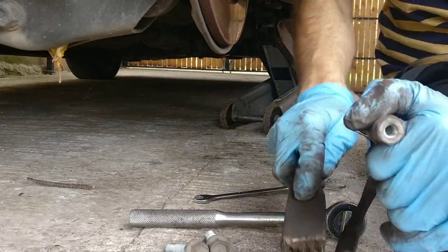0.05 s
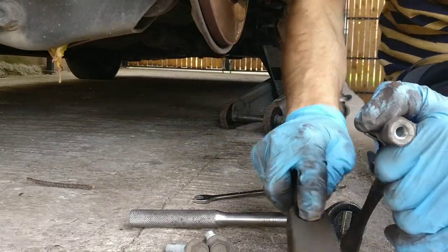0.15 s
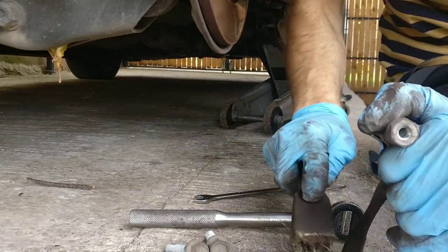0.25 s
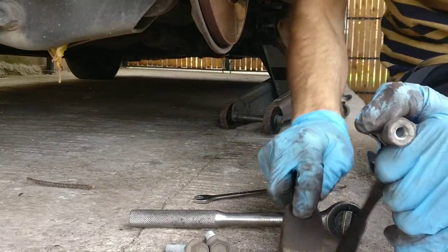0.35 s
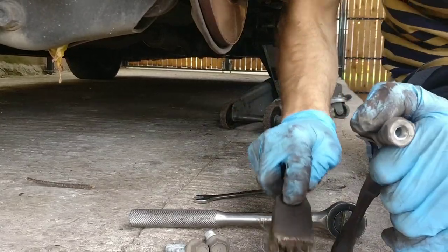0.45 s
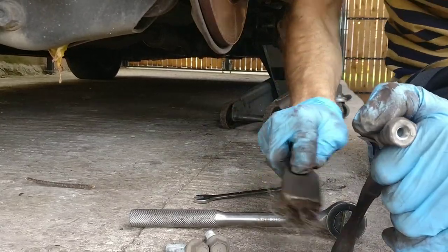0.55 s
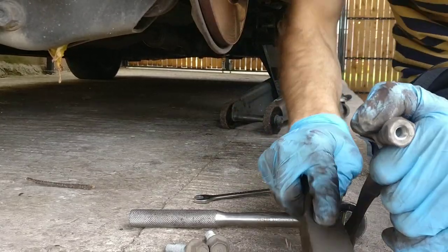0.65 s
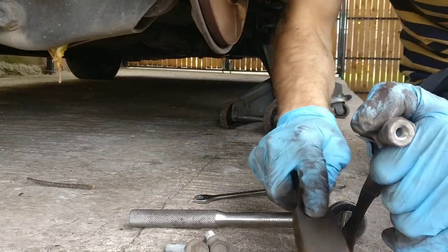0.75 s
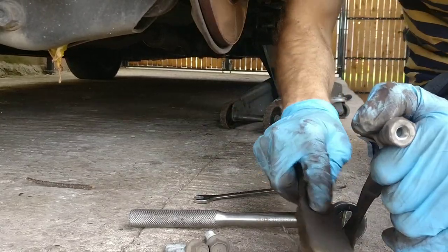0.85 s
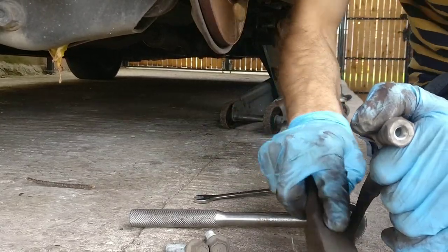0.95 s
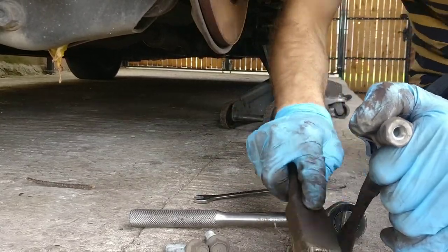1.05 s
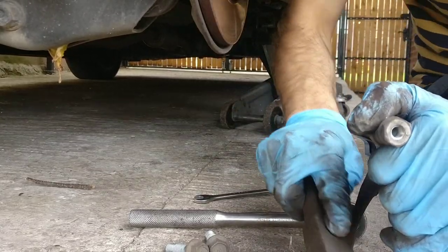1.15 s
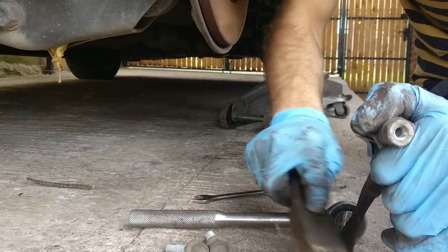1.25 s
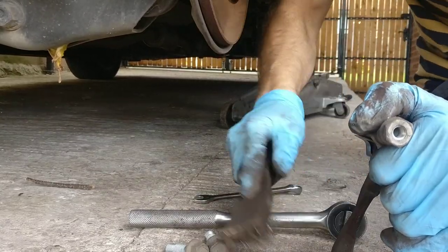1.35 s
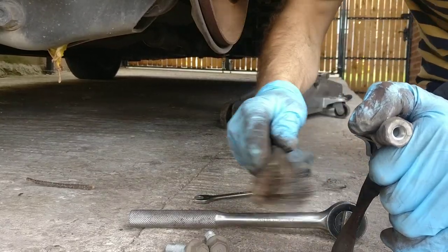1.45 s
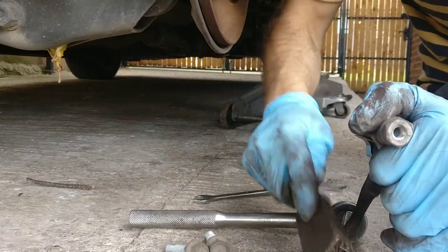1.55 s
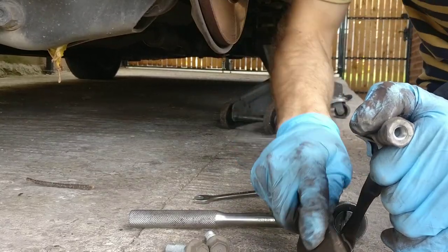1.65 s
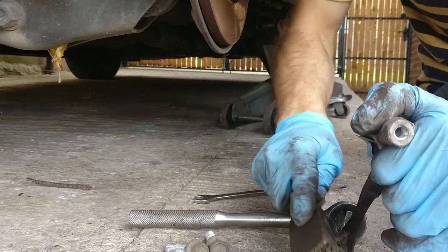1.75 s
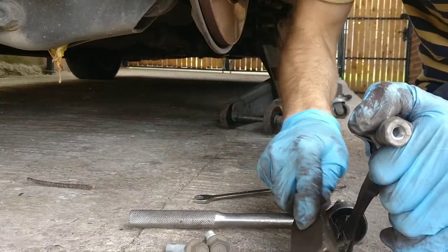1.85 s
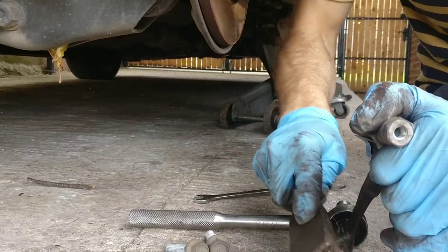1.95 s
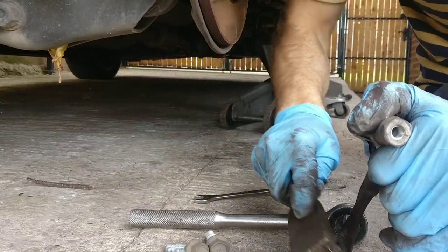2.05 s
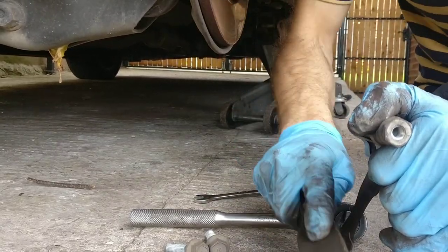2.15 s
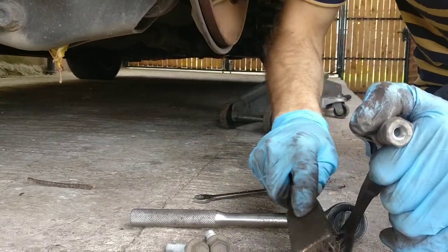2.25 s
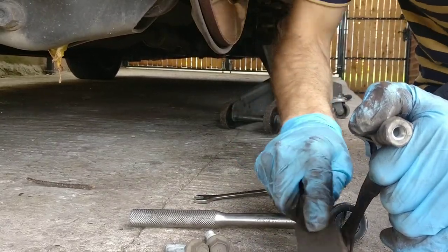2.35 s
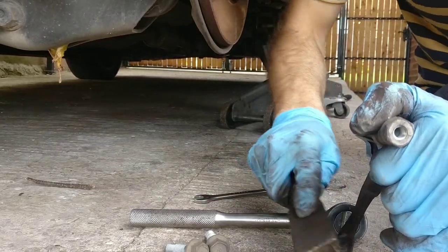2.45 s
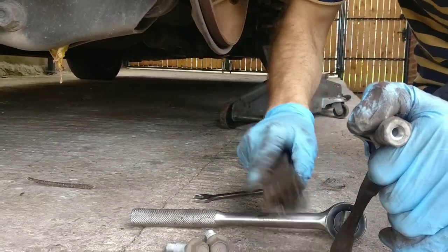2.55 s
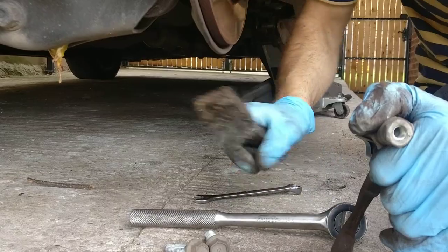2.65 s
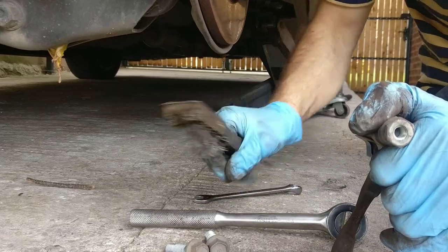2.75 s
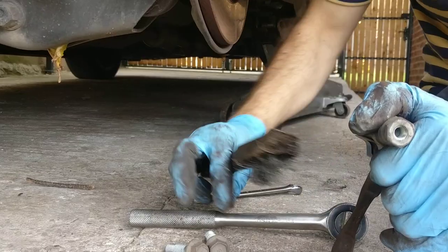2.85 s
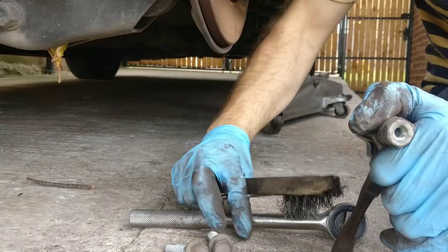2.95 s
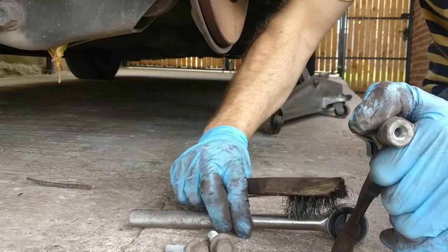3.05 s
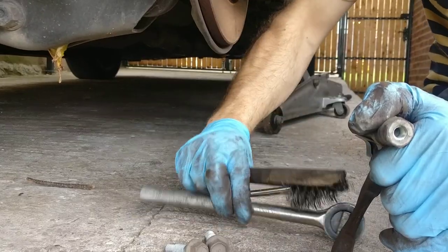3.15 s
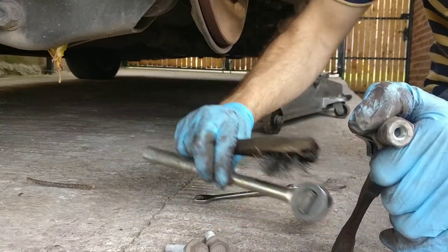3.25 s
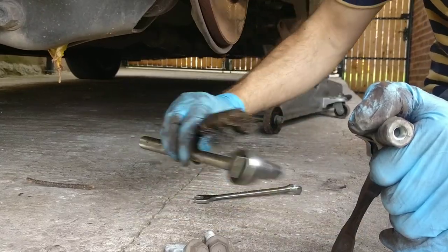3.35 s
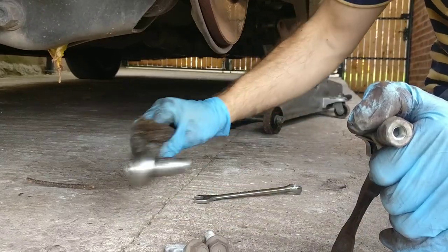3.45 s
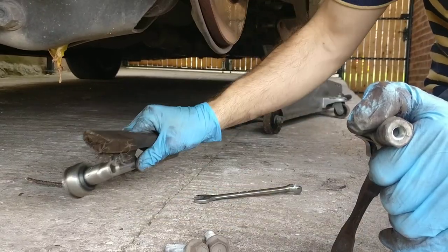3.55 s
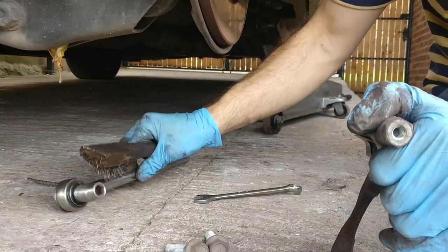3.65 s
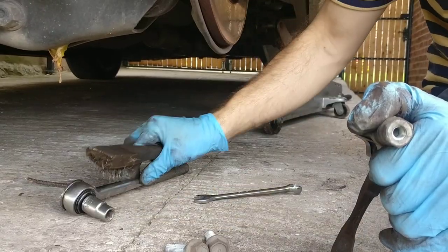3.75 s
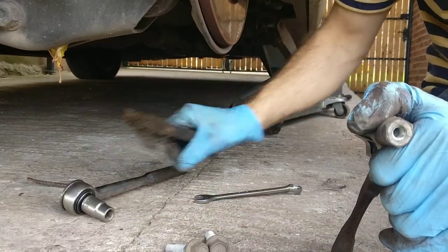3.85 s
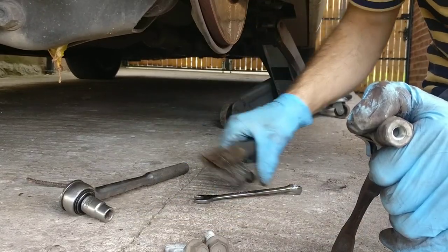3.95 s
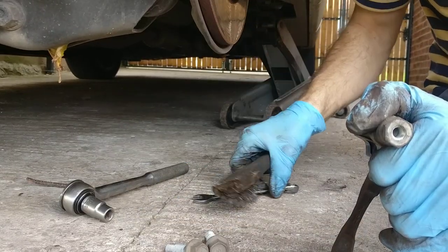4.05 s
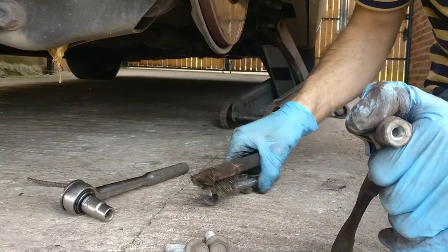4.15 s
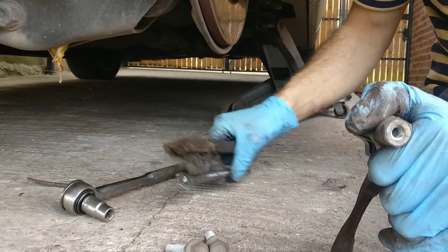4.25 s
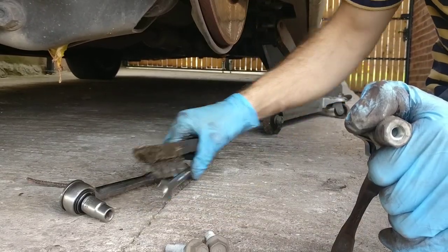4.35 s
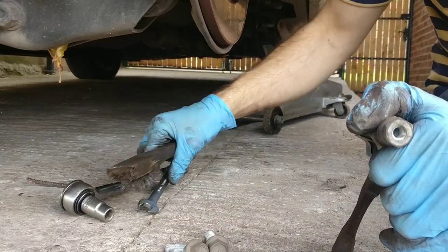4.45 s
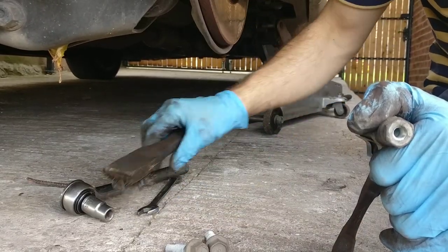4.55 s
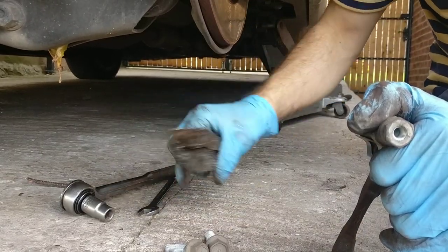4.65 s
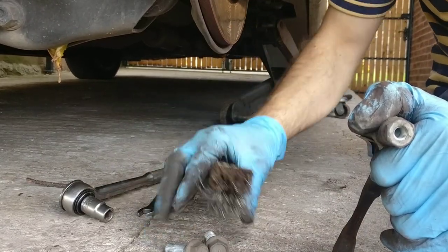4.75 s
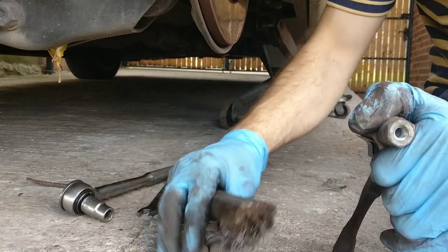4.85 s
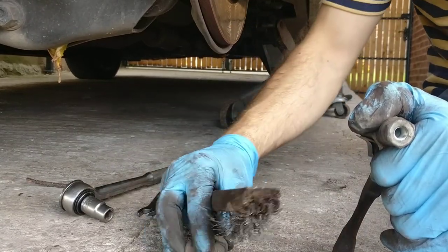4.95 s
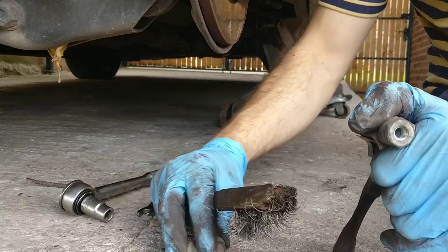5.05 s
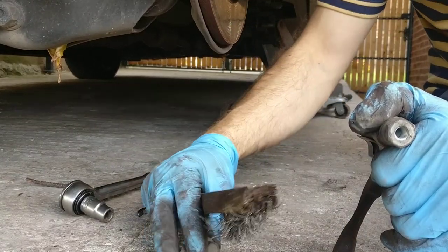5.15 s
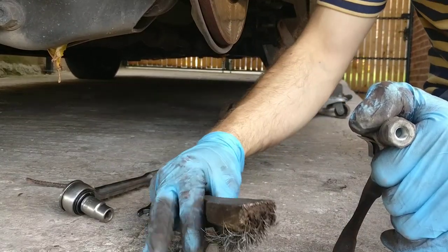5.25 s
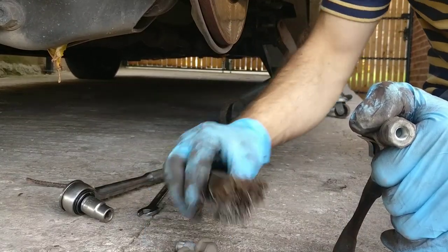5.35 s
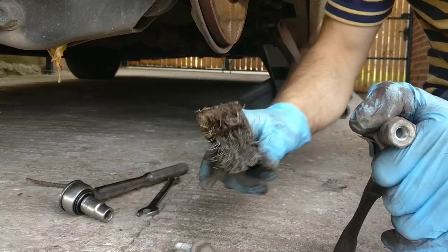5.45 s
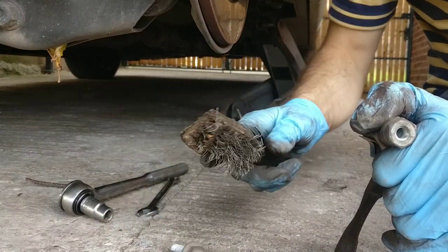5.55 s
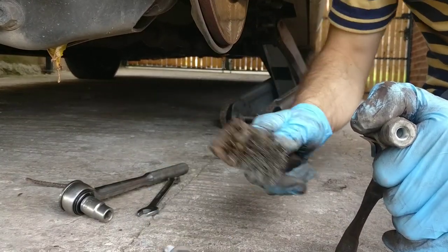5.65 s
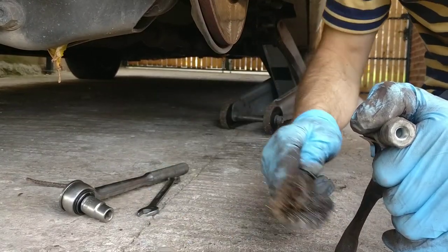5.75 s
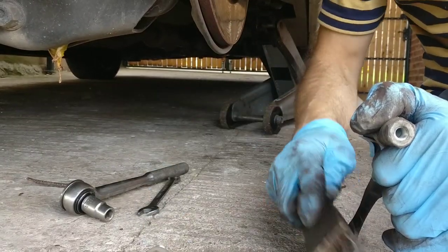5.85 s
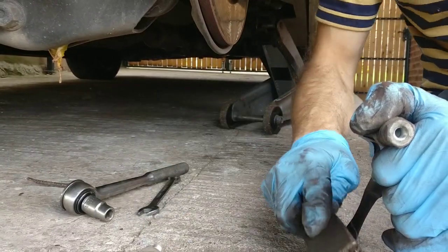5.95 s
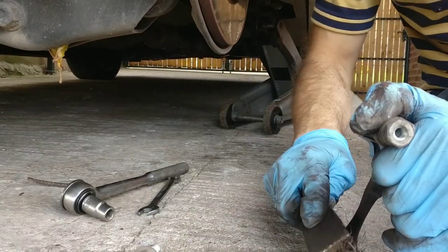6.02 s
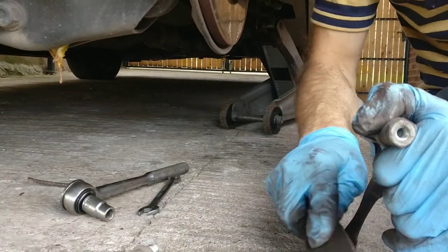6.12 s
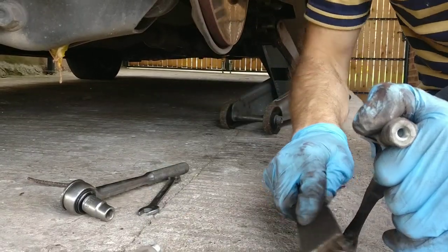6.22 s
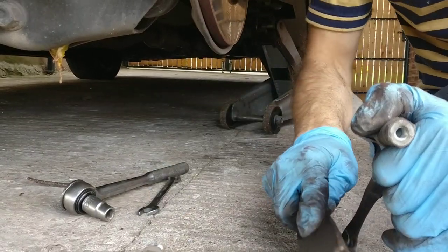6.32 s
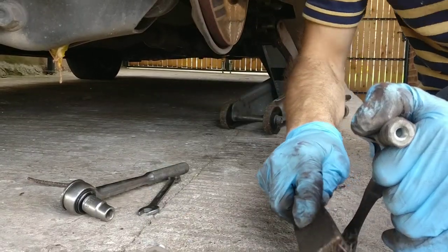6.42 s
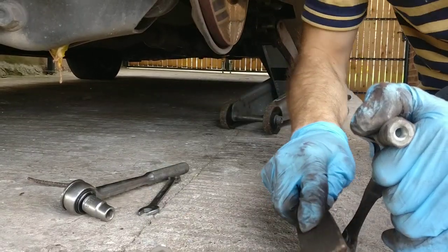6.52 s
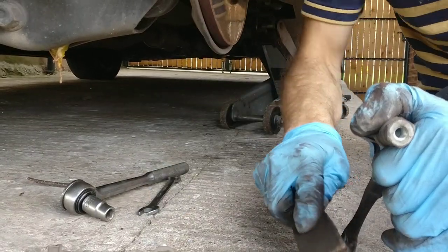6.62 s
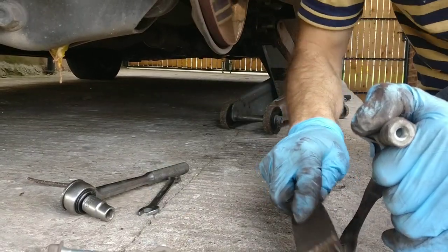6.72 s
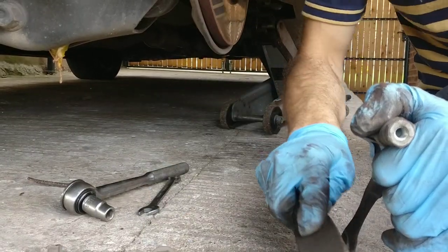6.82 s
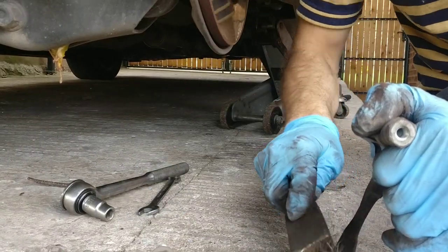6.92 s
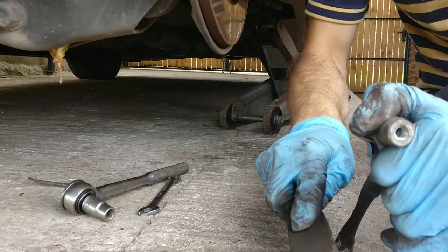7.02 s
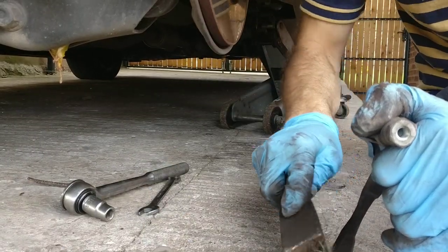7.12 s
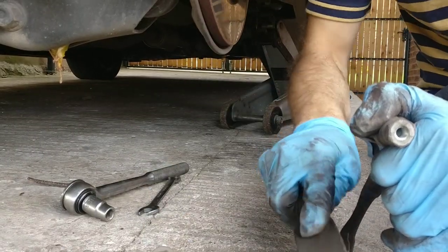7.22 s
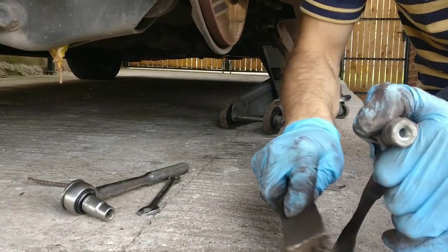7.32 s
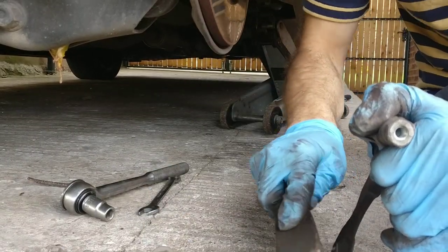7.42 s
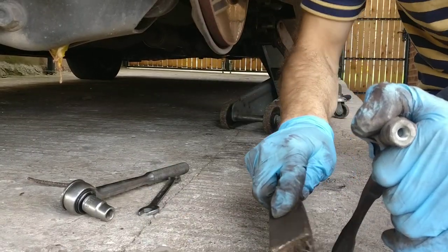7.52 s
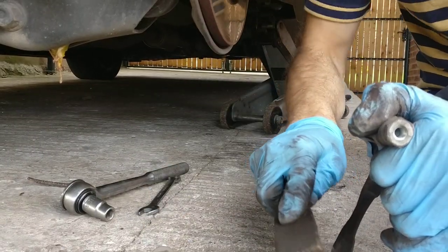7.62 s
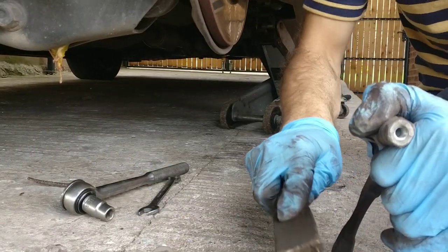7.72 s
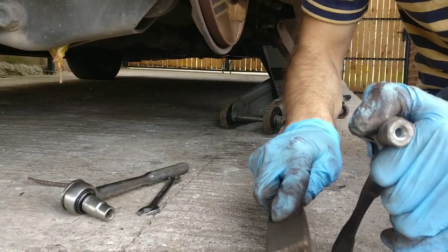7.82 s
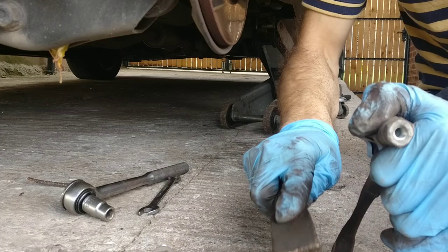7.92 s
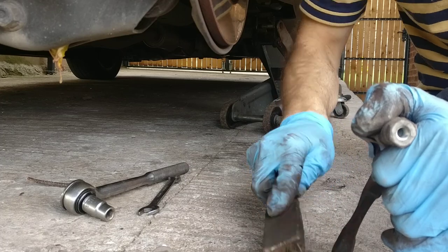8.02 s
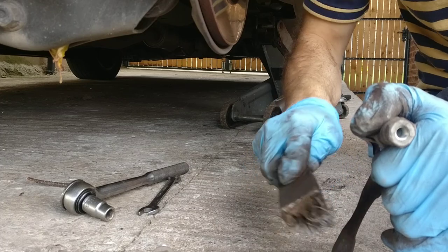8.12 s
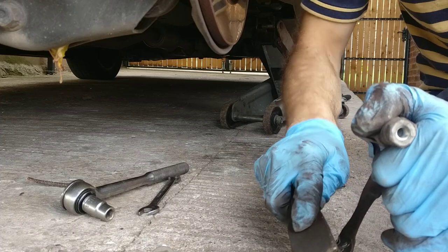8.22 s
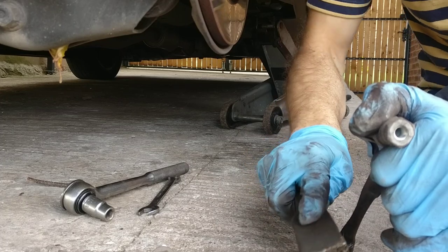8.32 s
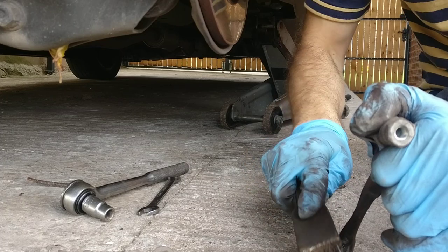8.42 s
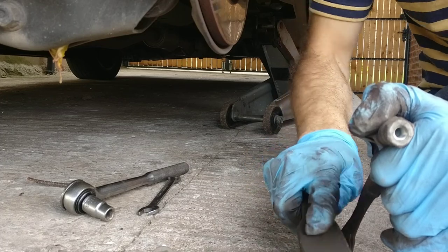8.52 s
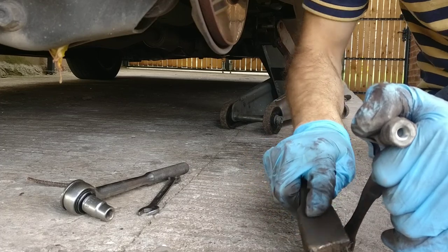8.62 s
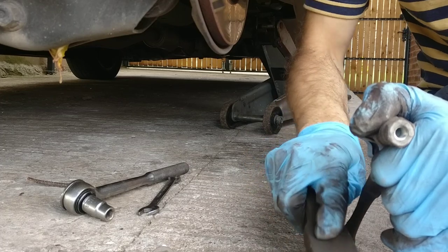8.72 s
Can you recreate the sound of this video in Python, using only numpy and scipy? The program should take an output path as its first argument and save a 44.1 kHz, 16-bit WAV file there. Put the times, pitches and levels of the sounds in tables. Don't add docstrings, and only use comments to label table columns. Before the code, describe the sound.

Harsh, treble-heavy scratching comes in short strokes about eight per second, with snapping wire ticks and dull knocks. A pause brings soft glove rustle, steel ticks, a hard ratchet set-down and a bright spanner scrape and jingle on concrete. Then faster, more even scrubbing continues. Close miking, short garage tail, low distant motors and steady air behind.

```python
import sys
import numpy as np
from scipy import signal
from scipy.fft import rfft, irfft, next_fast_len
from scipy.io import wavfile
from scipy.ndimage import uniform_filter1d, minimum_filter1d

SR = 44100
rng = np.random.default_rng(int(sys.argv[2]) if len(sys.argv) > 2 else 0)


def natural_amplitude(level_db):
    exponent = np.asarray(level_db, float) / 20
    return 10 ** exponent


def wrap_up_sound(samples):
    columns = np.atleast_2d(samples).T
    tamed = np.clip(columns, -1, 1)
    steps = np.round(tamed * 32767).astype(np.int16)
    wavfile.write(sys.argv[1], SR, steps)


N = 387198


def evened(x):
    return x / np.sqrt(np.mean(abs(x) ** 2) + 1e-20)


def read(points, hz):
    f, value = np.transpose(points)
    return np.interp(np.log(hz + 1), np.log(f + 1), value)


def add(mix, s, sound):
    part = mix[..., round(s * SR):][..., :sound.shape[-1]]
    part += sound[..., :part.shape[-1]]


def filtered(x, gain):
    size = next_fast_len(N)
    return irfft(rfft(x, size) * gain(np.fft.rfftfreq(size, 1 / SR)), size)[..., :N]


def pair(a, b, same):
    likeness = lambda hz: np.clip(read(same, hz), -1, 1)
    shared = filtered(a, likeness)
    own = filtered(b, lambda hz: np.sqrt(1 - likeness(hz) ** 2))
    return np.array([a, shared + own])


def over_time(points):
    s, db = np.transpose(points)
    return natural_amplitude(np.interp(np.arange(N) / SR, s, db))


def waver(hz, width_hz, t, steadiness):
    ticks = np.arange(t[0], t[-1] + .01, .001)
    r = np.exp(-np.pi * width_hz / 1000)
    pushes = [1, 1j] @ rng.standard_normal((2, len(ticks) + 500))
    slow = evened(signal.lfilter([1], [1, -2 * r, r * r], pushes)[500:])
    slow = slow / (abs(slow) + .05) ** steadiness
    carrier = np.exp(2j * np.pi * hz * t)
    return evened((np.interp(t, ticks, slow) * carrier).real)


def crack(length_s, tilt_db):
    t = np.arange(2048) / SR
    burst = rng.standard_normal((2, 2048)) * (np.exp(-t / length_s) + 0.29 * np.exp(-t / 0.008))
    burst[1] = 0.32 * burst[0] + 1.24 * burst[1]
    hz = np.fft.rfftfreq(2048, 1 / SR)
    slope = natural_amplitude(tilt_db * np.log2(hz / 3000 + 0.045))
    colour = slope * hz / (hz + 600) / (1 + (hz / 13000) ** 6)
    burst = irfft(rfft(np.roll(burst, 64, 1)) * colour)[:, 64:]
    return burst / abs(burst.mean(0)).max()


def brush():
    # hz, density_db
    wire_colour = [(4120, -53.5), (7000, -24), (7550, -24.5), (8240, -13), (10000, -3), (12000, 0),
                   (14100, -2.5), (15100, 0), (16000, -9)]
    # hz, density_db
    body_colour = [(150, -31.5), (250, -13.5), (430, -21.5), (800, -17.5), (2400, -3), (3300, -2.5),
                   (5000, -0.5), (6800, -1.5), (7600, -8.5), (9880, -27), (16700, -120)]
    # hz, width_hz, level_db
    part_modes = [(1460, 90, -2), (2830, 180, 2), (3880, 130, -5), (5560, 200, -6), (6670, 120, -4),
                  (6970, 80, -4)]
    # hz, likeness
    near_same = [(300, 0.68), (2000, 1), (2800, 0.2), (3400, .55), (4500, -0.38), (6400, -0.18),
                 (9000, 0.025)]
    tufts_db = 2.8 * evened(uniform_filter1d(rng.standard_normal(N), 100))
    clumps_db = 1.98 * evened(uniform_filter1d(rng.standard_normal(N), 600))
    snap_db = 1.1 * np.minimum(rng.exponential(1, N), 4)
    snapping = rng.random(N) < 6000 / SR
    sizes = natural_amplitude(tufts_db + clumps_db) * natural_amplitude(snap_db) * snapping
    wire = rng.integers(0, 6, N)
    quivers = rng.standard_normal((6, 2, 256)) * np.exp(-np.arange(256) / (0.00087 * SR))
    quivers = irfft(rfft(quivers) / abs(rfft(quivers)))
    a, b = 0, 0
    for k, quiver in enumerate(quivers):
        flicks = sizes * (wire == k) * rng.choice([-1, 1], N)
        left, right = signal.oaconvolve([flicks], quiver, axes=1)[:, :N]
        a, b = a + left, b + right
    snaps = pair(a, b, near_same)
    ring = lambda hz: sum(natural_amplitude(db) / (1 + ((hz - f) / (width / 2)) ** 2) for f, width, db in part_modes)
    wires = evened(filtered(snaps, lambda hz: natural_amplitude(read(wire_colour, hz))))
    body = evened(filtered(snaps, lambda hz: natural_amplitude(read(body_colour, hz)) * (1 + .5 * ring(hz))))
    wire_gain = over_time(stroke_points(0.94, 0)) + rubbing(0)
    body_gain = over_time(stroke_points(0.88, 0.99)) + rubbing(0.7)
    return natural_amplitude(2.5) * wires * wire_gain + natural_amplitude(1.0) * body * body_gain


def stroke_points(turn_share, with_body):
    # start_s (full speed), held_s, level_db, slowing_db (at the turn before)
    strokes = [ (0.001, 0.031, -17.5, 6), (.113, .067, -20, -27), (.231, 0.037, -16, -27),
               (.319, 0.0066, -22.5, -56), (.347, 0.0068, -31, -13.5), (.506, 0.081, -21, -15),
               (.643, 0.053, -17.5, -18.5), (.775, 0.054, -18, -19.5), (.88, 0.065, -16.5, -21),
               (1.006, 0.052, -16.5, -29), (1.134, 0.064, -15.5, -17.5), (1.454, 0.11, -22, -62),
               (1.611, 0.068, -17.5, -26), (1.723, 0.063, -20, -20), (1.865, 0.026, -18, -17.5),
               (1.971, .063, -20, -18.5), (2.098, 0.03, -15.5, -21.5), (2.219, 0.03, -18, -13.5),
               (2.338, 0.042, -19, -11.5),
               (5.772, 0.026, -26.5, -11), (5.876, .035, -19, -18), (5.977, 0.028, -18.5, -24),
            (6.073, 0.055, -17, -16), (6.203, 0.025, -17.5, -16.5), (6.315, 0.028, -16, -9),
            (6.414, 0.043, -18.5, -18), (6.503, 0.056, -17, -17), (6.648, 0.04, -16, -16.5),
            (6.737, 0.065, -18.5, -11), (6.851, 0.047, -17.5, -17), (6.966, 0.051, -20.5, -18),
            (7.074, 0.042, -17.5, -21), (7.179, 0.053, -16.5, -20), (7.301, 0.026, -19, -14.5),
            (7.397, 0.031, -20, -12), (7.508, 0.044, -21, -13.5), (7.606, 0.065, -19.5, -13.5),
            (7.72, 0.05, -20.5, -23), (7.842, 0.058, -18, -22), (8.073, 0.11, -25.5, -11),
            (8.237, 0.048, -20, -21.5), (8.348, 0.049, -18, -15), (8.443, 0.061, -20.5, -21),
            (8.575, 0.046, -18, -17.5), (8.681, .05, -17, -20), (8.79, .01, -17.5, -17)]
    pause_s, land_s, lift_s = .13, 0.0055, 0.016
    push_db, pull_db = -9.5, -12.5
    rows = strokes
    points, end, count = [], -1, 0
    for (s, hold, db, turn_db), after in zip(rows, rows[1:] + [(N, 0, 0, 0)]):
        landing = s - end > pause_s
        count = 0 if landing else count + 1
        top = db + with_body * (pull_db if count % 2 else push_db)
        turn = s - land_s if landing else end + 0.4 * (s - end)
        if landing:
            points.append((turn - .002, -120))
        points += [(turn, top + turn_share * turn_db), (s, top)]
        end = min(s + hold, after[0] - .005)
        points.append((end, top))
        if after[0] - end > pause_s:
            points += [(end + lift_s, top - 20), (end + 2 * lift_s, -120)]
    return points


def rubbing(with_body):
    # peak_s, swell_s, fade_s, level_db, body_db (against the wires)
    rubs = [(.372, .01, 0.51, -55.5, -2.5), (1.235, .01, 0.74, -49.5, 1), (2.405, .02, 0.15, -36, -10.5),
            (2.672, .06, 0.07, -38, -11.5), (2.76, .5, 0.8, -60.5, -0.5), (2.951, .25, 0.034, -56, 3.5),
            (3.0, .01, 0.13, -47, -2.5), (3.16, .3, 0.017, -56.5, -11.5), (3.66, .05, 0.17, -47, 0),
            (3.78, .2, 0.023, -61, 9), (3.931, .15, .02, -58, -1), (4.116, .04, 0.15, -58, 1),
            (4.7, .05, 0.15, -64.5, 3.5), (4.765, .004, 0.072, -50.5, -22), (4.92, .5, 0.51, -72, 7),
            (5.175, .25, 0.084, -64, 4), (5.31, .3, 0.17, -57.5, -8.5), (5.449, .2, .2, -57, -8),
            (5.553, .06, 0.074, -51.5, -0.5), (7.93, .01, 0.075, -37, -41), (8.0, .3, .3, -70, 13.5)]
    span_db = -25
    t = np.arange(0, N, 32) / SR
    gain = 0
    for s, swell, fade, db, body_db in rubs:
        away = np.where(t < s, (s - t) / swell, (t - s) / fade)
        gain = gain + natural_amplitude(db + with_body * body_db + span_db * away)
    return np.repeat(gain, 32)[:N]


def tufts():
    # start_s, peak_db, brightness_db_per_octave
    releases = [(0.059, -15, 2), (0.306, -16.5, 0.5), (0.507, -43, -5), (0.993, -19, 2), (1.4571, -24, -2),
                (1.5654, -26, 1), (1.717, -34, 0.5), (1.829, -19, 2), (6.959, -14, 7), (5.7542, -35, 4),
                (5.7816, -35, -4), (6.272, -11, 11), (6.3845, -21, 10), (6.4803, -18, 11),
                (6.616, -23.5, 2), (8.0711, -33.5, 12), (8.104, -29, 7), (8.1322, -17, -1)]
    out = np.zeros((2, N))
    for s, db, tilt_db in releases:
        add(out, s, natural_amplitude(db) * crack(0.0014, tilt_db))
    return out


def knocks():
    # start_s, peak_db, pitch_hz, t60_s
    blows = [(.004, -29, 246, 0.061), (0.061, -13, 2610, 0.0084), (0.264, -29, 310, 0.041),
             (0.527, -39, 150, 0.044), (1.22, -56, 1150, 0.56), (1.457, -25.5, 985, 0.011),
             (1.639, -40.5, 195, 0.15), (1.78, -40, 275, 0.026), (2.321, -49.5, 167, 0.026),
             (3.547, -51, 720, 0.025), (3.61, -40.5, 327, 0.032), (4.294, -51.5, 700, 0.062),
             (5.787, -34, 1470, 0.095), (5.816, -53, 1440, .08), (5.999, -33.5, 1450, 0.084),
             (6.095, -35, 146, 0.052), (6.65, -41.5, 260, 0.039)]
    partials = ((1, 5.5), (0.72, -16.5), (1.3, -2.5), (1.5, -1.0))
    out, t = np.zeros((2, N)), np.arange(SR // 2) / SR
    for s, db, hz, t60 in blows:
        ring = 0
        for k, d in partials:
            if k == 1 or hz < 1000:
                ring = ring + natural_amplitude(d - 60 * t * k / t60) * np.sin(2 * np.pi * hz * k * t)
        add(out, s, natural_amplitude(db) * ring * (1 - np.exp(-t / 0.00081)))
    return out


def ratchet():
    # start_s, peak_db, ring_db (from the crack), brightness_db_per_octave
    blows = [
        (3.548, -11, -0.5, 3),
        (3.599, -18.5, -24, 12),
        (3.612, -15, -7, 1),
        (3.6229, -6, -18, 6.5),
        (3.637, -21.5, -14, -2),
    ]
    # pitch_hz, level_db, t60_s
    bar_modes = [(1100, -38, 0.076), (2920, -8.5, 0.067), (3200, -24, 0.076), (4330, -19, 0.024),
                 (5400, -10.5, 0.043), (7240, -21, 0.067)]
    out, t = np.zeros((2, N)), np.arange(SR // 2) / SR
    for s, db, ring_db, tilt_db in blows:
        where = rng.standard_normal(len(bar_modes))
        ring = 0
        for w, (hz, d, t60) in zip(where, bar_modes):
            ring = ring + natural_amplitude(d + 2 * w - 60 * t / t60) * np.sin(2 * np.pi * hz * t)
        add(out, s, natural_amplitude(db + ring_db) * ring)
        add(out, s, natural_amplitude(db) * crack(0.0012, tilt_db))
    return out


def floor_ticks():
    # start_s, peak_db, brightness_db_per_octave
    touches = [(2.5546, -38.5, -1.5), (2.9005, -27, 1), (2.9706, -7.5, 5.5), (3.088, -31, 0.5),
               (3.8887, -40, 2), (3.9437, -29.5, 2.5), (4.0021, -24, 3.5), (4.119, -42.5, 3),
               (4.2955, -24.5, -0.5), (4.3526, -3, 9.5), (4.4042, -13, 18), (4.429, -13, 9),
               (4.7615, -51, 0.5), (4.8444, -41, -3), (4.946, -43, -3.5), (4.9994, -45, -5.5),
               (5.0216, -32, -2.5), (5.5458, -43, -7)]
    out = np.zeros((2, N))
    for s, db, tilt_db in touches:
        add(out, s, natural_amplitude(db) * crack(0.0014, tilt_db))
    return out


def spanner():
    # pitch_hz, width_hz
    bar_hz = [
        [(900, 90), (2000, 70), (2137, 70), (3005, 60), (4312, 14)],
        [(7325, 25)],
        [(5519, 14), (9388, 20), (10270, 20)],
        [(11178, 25), (13545, 30), (15447, 30)],
    ]
    bar_db = [
        [-36, -12.5, -14, -17.5, -0.5],
        [0],
        [-7.5, -11, 0],
        [0, -15.5, 0],
    ]
    best_place = [
        [0.12, 0.098, 0.045, 0.3, 0.044],
        [0.52],
        [0.66, 0.9, .72],
        [1, 0.68, .25],
    ]
    family_t60 = [0.078, 0.057, 0.13, 0.064]
    out, rocking = np.zeros((2, N))
    span = slice(round(3.9 * SR), round(5.0 * SR))
    t = np.arange(N)[span] / SR
    for modes, levels, places, t60 in zip(bar_hz, bar_db, best_place, family_t60):
        for (hz, width), db, best in zip(modes, levels, places):
            out[span] += natural_amplitude(db) * waver(hz, width, t, 0.74) * ringing(best, t60, t)
    chatter_db = 3 * evened(uniform_filter1d(rng.standard_normal(N), 300))
    out *= natural_amplitude(chatter_db)
    rocking[span] = ringing(0.68, .06, t)
    grit_colour = lambda hz: hz ** 2 / (hz ** 2 + 4000 ** 2) / (1 + (hz / 13000) ** 4)
    grit = evened(filtered(rng.standard_normal((2, N)), grit_colour))
    bar = np.array([np.roll(out, 8), out])
    return natural_amplitude(6.5) * bar + natural_amplitude(-21) * grit * rocking


def ringing(best, t60, t):
    # start_s, slide_s, force_db, place (0-1 along the bar)
    contacts = [(3.936, 0.017, -39.5, 0.34), (3.94, 0.098, -51.5, 0.96), (4.002, 0.014, -33, 0.23),
                (4.018, 0.036, -36.5, 0), (4.118, .03, -70, 0.2), (4.293, .014, -43, 0.08),
                (4.352, 0.04, -31, 0.48), (4.353, 0.1, -24, 1), (4.39, 0.026, -22, 0.43),
                (4.435, .034, -19.5, 0.55), (4.465, 0.064, -22, 0.85), (4.5, 0.044, -44, 0.16)]
    away_db, grip_s = -45, 0.0027
    free_db, free_t60 = -20.5, 0.5
    power = 0
    for s, slide, db, place in contacts:
        after = np.maximum(t - s - slide, 0)
        tail = natural_amplitude(-60 * after / t60) + natural_amplitude(free_db - 60 * after / free_t60)
        drive = natural_amplitude(db + away_db * abs(place - best))
        power = power + (drive * tail * np.clip((t - s) / grip_s, 0, 1)) ** 2
    return np.sqrt(power)


def garage(x):
    # hz, t60_s
    decay = [(300, 0.13), (3000, 0.2), (12000, 0.094)]
    taps = rng.standard_normal((2, SR // 2)) * (rng.random((2, SR // 2)) < .05)
    taps[:, :150] = 0
    hz, t, z = signal.stft(taps, SR, nperseg=256)
    dying = natural_amplitude(-60 * t / read(decay, hz)[:, None])
    tail = signal.istft(z * dying, SR, nperseg=256)[1]
    return signal.fftconvolve(x, tail / np.linalg.norm(tail[0]), axes=1)[:, :N]


def motors():
    # start_s, slower_db, faster_db, rasp_db (exhaust of both)
    load = np.array([
        (0.0, -52, -57, -58),
        (0.32, -55, -47, -62.5),
        (1.98, -58, -61.5, -59),
        (3.94, -51.5, -59.5, -61.5),
        (4.25, -51, -63, -70.5),
        (5.2, -54.5, -72, -59),
        (5.94, -53.5, -53.5, -61),
        (6.89, -46, -55, -63),
        (7.95, -49, -64.5, -69),
        (8.78, -52, -44, -62.5),
    ])
    slow, fast = [82.4, 93.4]
    slow_gain, fast_gain, rasp = (over_time(load[:, [0, k]]) for k in (1, 2, 3))
    lines = [(slow, slow_gain), (fast, fast_gain), (2 * slow, rasp), (2 * fast, rasp),
             (3 * slow, natural_amplitude(-7.5) * rasp)]
    t = np.arange(N) / SR
    return sum(gain * waver(hz, 1.39, t, 0.41) for hz, gain in lines)


def outdoor_wash():
    # hz, density_db
    air_colour = [(15, -29), (30, 7), (55, 20.5), (100, 20), (200, 10), (350, -0.5), (1000, -3.5),
                  (7500, -14.5), (14400, -9.5), (15300, -17.5), (15900, -25)]
    # hz, likeness
    air_same = [(60, 0.4), (180, 1), (550, 0.1), (1650, -0.4), (4970, 0.5), (15000, -0.01)]
    noise = pair(*rng.standard_normal((2, N)), air_same)
    wash = filtered(noise, lambda hz: natural_amplitude(read(air_colour, hz)))
    return wash / np.std(filtered(wash[0], lambda hz: hz > 300)) * natural_amplitude(-69 + 4.5)


def scene():
    near = brush() + tufts() + knocks() + ratchet() + floor_ticks() + spanner()
    return near + natural_amplitude(-6.0) * garage(near) + motors() + outdoor_wash()


def drop_weak_bands(x):
    # hz, limit_db
    blanks = [(1500, -60), (2400, -14), (3000, -5), (4500, -3.5), (6500, -3), (7400, -3), (8600, -6),
              (9600, -14), (13000, -14), (14500, -9)]
    hz, t, z = signal.stft(x, SR, nperseg=2048, noverlap=1536)
    power = uniform_filter1d(abs(z.mean(0)) ** 2, 3, axis=1)
    band_db = 10 * np.log10(power[:1024].reshape(64, 16, -1).mean(1) + 1e-16)
    jitter_db = 4.3 * evened(uniform_filter1d(rng.standard_normal(band_db.shape), 3, axis=1))
    limit_db = uniform_filter1d(band_db, 7, axis=0) + read(blanks, hz[8:1024:16])[:, None]
    keep = minimum_filter1d(1. * (band_db + jitter_db > limit_db), 3, axis=1)
    total_db = 10 * np.log10((abs(z[:, 50:]) ** 2).sum((0, 1)) + 1e-16)
    blow = np.pad(total_db[2:] - total_db[:-2], 1) > 9
    keep = np.maximum(keep, uniform_filter1d(1. * blow, 5) > 0)
    keep = np.pad(np.repeat(keep, 16, axis=0), ((0, 1), (0, 0)))
    return signal.istft(z * keep, SR, nperseg=2048, noverlap=1536)[1][:, :N]


def roll_off(x):
    return signal.sosfilt(signal.butter(12, 16820, fs=SR, output="sos"), x)


def record(dry):
    # hz, left_over_right_db
    port_db = [(90, -6.5), (150, 0.5), (2500, 2.5), (6500, -.5), (7800, 3.5), (8600, 10), (10000, 16),
               (12000, 21), (13500, 11.5), (15000, 4.5)]
    edge_hz, edge_width_hz = 15800, 400
    ratio = lambda hz: natural_amplitude(-read(port_db, hz))
    left = lambda hz: 2 / (1 + ratio(hz)) ** (1 / 1.136)
    right = lambda hz: left(hz) * ratio(hz)
    ports = natural_amplitude(-3.5) * np.array([filtered(dry[0], left), filtered(dry[1], right)])
    edge = lambda hz: np.clip((edge_hz - hz) / edge_width_hz + .5, 0, 1) ** 2
    ports = filtered(np.tanh(ports), edge)
    return roll_off(drop_weak_bands(ports))


dry = scene()
out = record(dry)
wrap_up_sound(out)
```